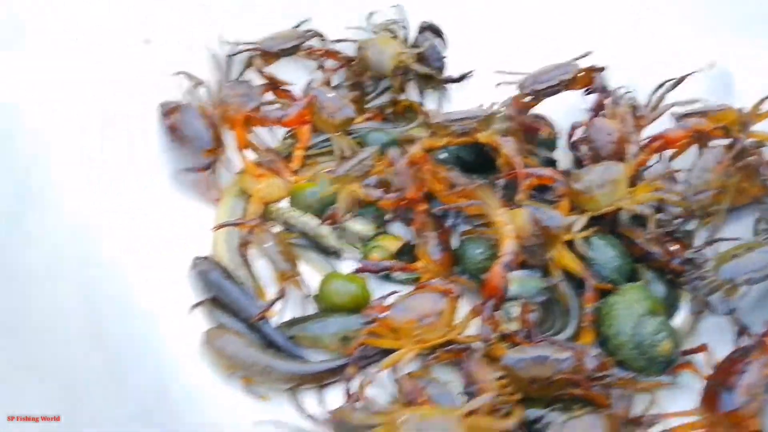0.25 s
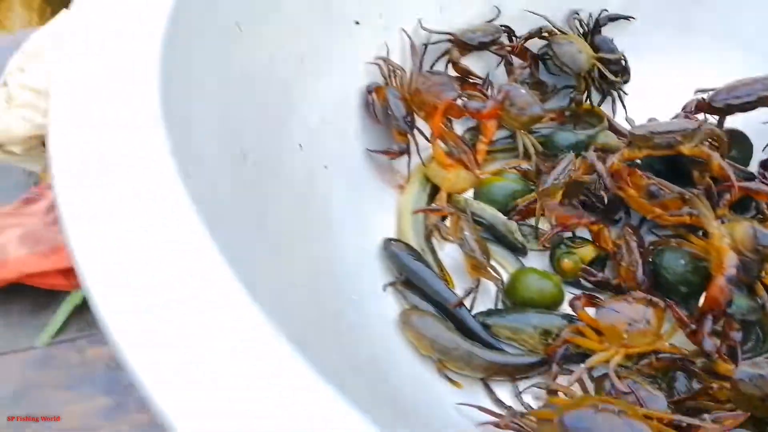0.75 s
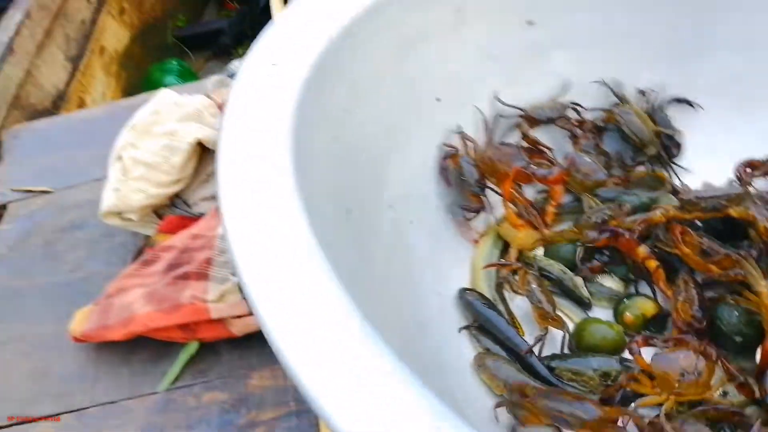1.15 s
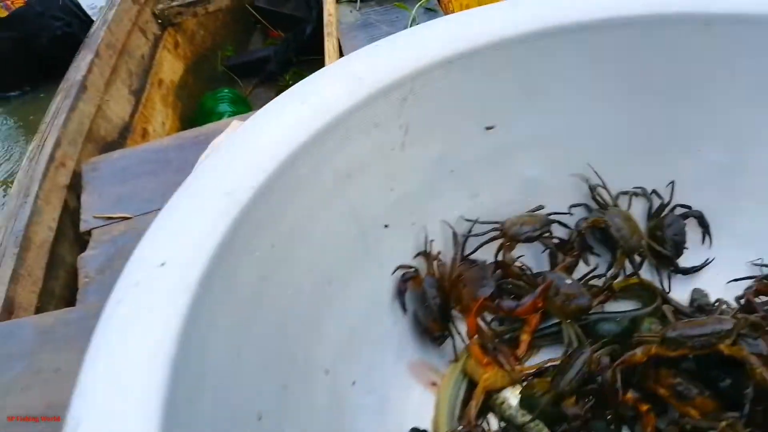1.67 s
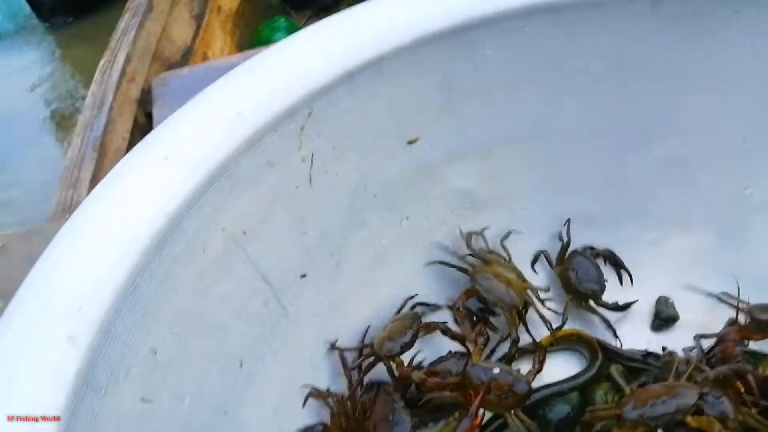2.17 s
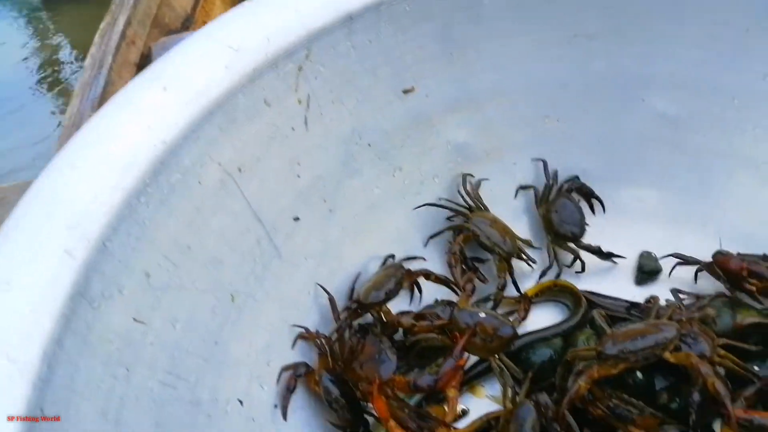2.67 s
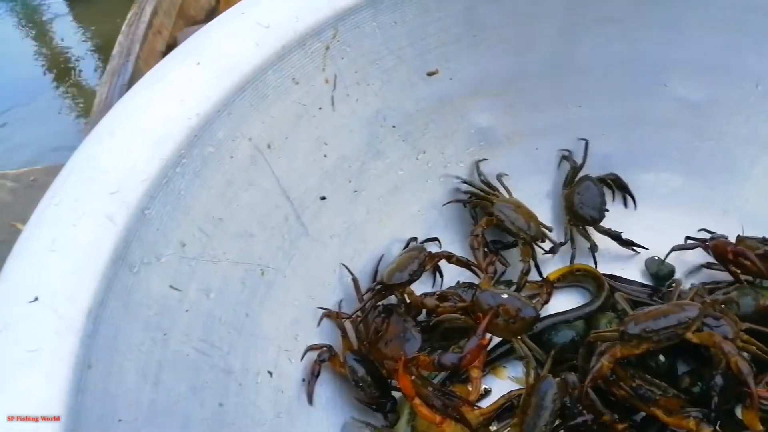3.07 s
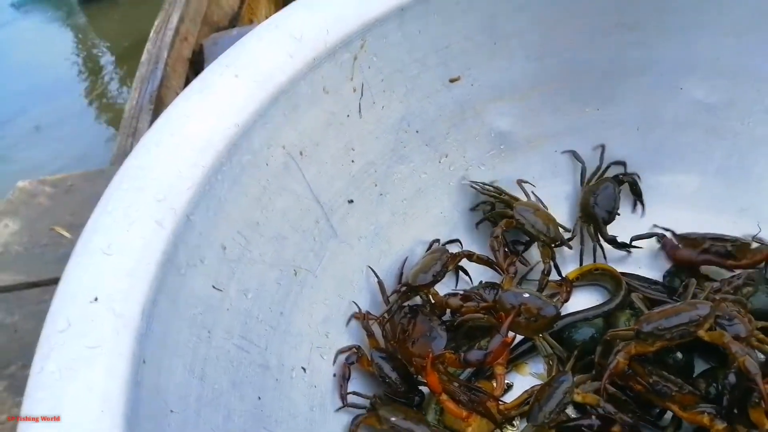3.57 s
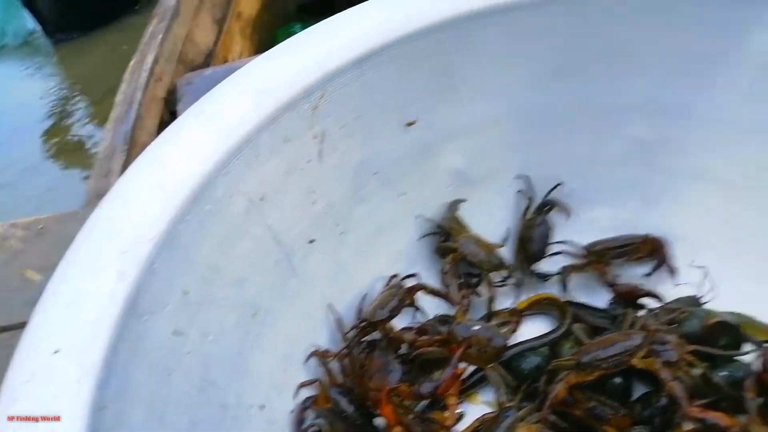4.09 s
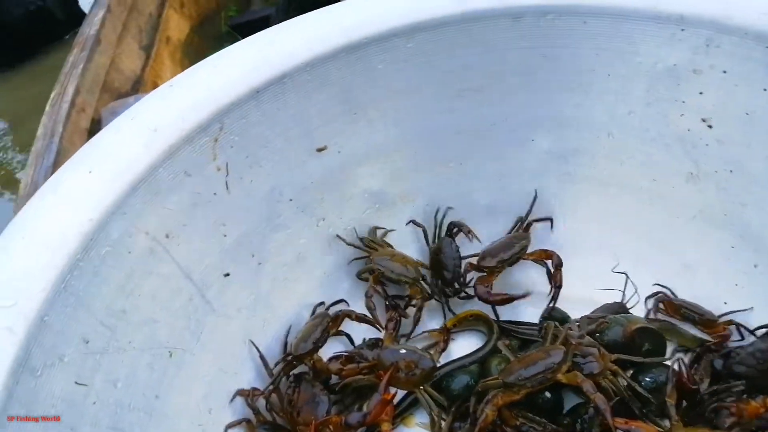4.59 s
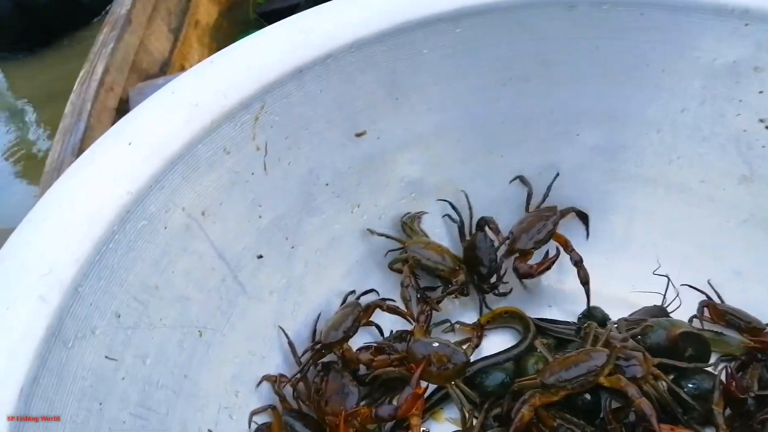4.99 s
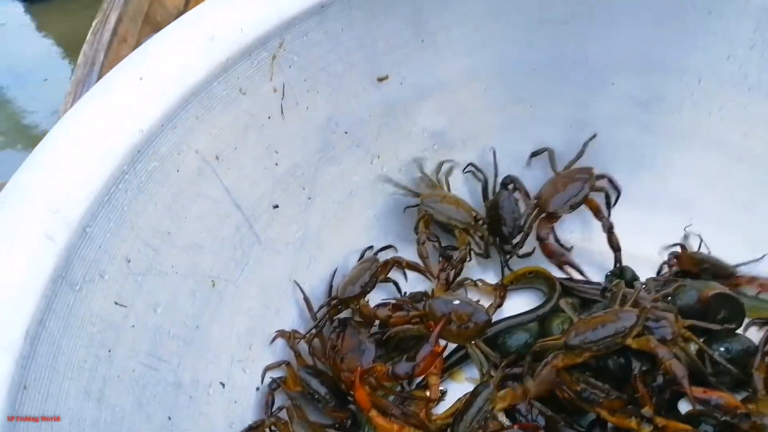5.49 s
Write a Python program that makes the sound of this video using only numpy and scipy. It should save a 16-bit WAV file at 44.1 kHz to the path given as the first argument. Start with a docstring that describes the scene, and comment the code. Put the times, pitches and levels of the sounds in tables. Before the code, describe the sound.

Live crabs and a few fish move in a large plastic tub outdoors, heard close. Throughout, claws scratch in uneven showers of tiny bright clicks, mixed with wet slithering and brief snaps of shell on shell. From about 1.2 to 2.2 seconds a hand handles the camera loudly: rubbing and hollow knocks around 1.5, then a cluster of dull thuds around 2. Shells tap the tub wall sharply at 2 and 2.8 seconds, and hardest at 3.3, where the wall rings briefly and the tub booms softly. Busier scraping, leg rasps and taps follow until about 3.9. The scrabbling then eases, with small pings and a tap near 4.5, and another short hand knock and rub at 4.7. Clicking picks up again from 5.2 seconds to the end, near 5.7. A faint hush of open air and a light breeze rumble lie underneath.

```python
"""Live crabs and a few fish crawl over one another in a large plastic tub on a wooden boat.
Claws scratch in showers of tiny clicks, wet bodies slither, and shells tap the wall, once very hard.
The wall rings and the air in the tub booms softly. Close by, a hand rubs, bumps and knocks
on a camera body, while a light breeze rumbles on the microphones."""
import sys
import numpy as np
from scipy import signal
from scipy.fft import rfft, irfft
from scipy.io import wavfile

SR = 44100
rng = np.random.default_rng(int(sys.argv[2]) if len(sys.argv) > 2 else 0)


def dump_mix(stems):
    """Bounce the given channels to the path in sys.argv[1] as a 16-bit WAV at rate SR."""
    frames = np.atleast_2d(stems).T  # one column per channel
    limited = np.clip(frames, -1, 1)  # hard clip at full scale
    pcm = np.round(limited * 32767).astype(np.int16)
    wavfile.write(sys.argv[1], SR, pcm)


N = 253134
TIME = np.arange(N) / SR


# One crab after another climbing the heap: t/s, length/s, scratch level/dB, slither level/dB, shell f/Hz
SCRAMBLE_MOVES = [(-0.02, 0.15, -41.5, -47, 2880), (0.143, 0.12, -41.5, -52.5, 2620),
                  (0.277, 0.083, -43, -64, 3250), (0.38, 0.25, -44, -55.5, 2860),
                  (0.649, 0.042, -40, -55, 2800), (0.793, 0.086, -46, -73, 2940),
                  (0.883, 0.14, -43.5, -54.5, 2760), (1.02, 0.041, -38, -40, 3350),
                  (1.172, 0.064, -44, -59, 3200), (1.24, 0.06, -40, -59, 3200),
                  (1.28, 0.46, -41, -48.5, 3640), (1.69, 0.029, -35, -49, 3470),
                  (1.767, 0.56, -39.5, -50.5, 3140), (2.082, 0.1, -32.5, -43, 3360),
                  (2.159, 0.115, -56, -43, 3340), (2.369, 0.16, -47, -48.5, 3200),
                  (2.541, 0.093, -38.5, -47, 3060), (2.645, 0.089, -40.5, -48.5, 3700),
                  (2.761, 0.16, -38, -49.5, 3440), (2.918, 0.11, -41, -50.5, 2600),
                  (3.027, 0.12, -40.5, -49, 3230), (3.073, 0.067, -36, -43.5, 3000),
                  (3.158, 0.26, -37.5, -50, 3380), (3.26, 0.075, -28.5, -38.5, 3520),
                  (3.391, 0.045, -32.5, -54, 2925), (3.436, 0.18, -33, -46, 3400),
                  (3.633, 0.25, -35.5, -45.5, 3000), (3.86, 0.14, -47, -53, 3220),
                  (4.03, 0.17, -43, -53, 3220), (4.24, 0.059, -42.5, -53, 3000),
                  (4.366, 0.1, -43, -52, 2960), (4.516, 0.23, -46.5, -54.5, 3230),
                  (4.8, 0.087, -42.5, -52.5, 3320), (4.946, 0.024, -45, -61, 3180),
                  (4.99, 0.092, -47, -51, 3150), (5.13, 0.032, -36.5, -67, 3320),
                  (5.205, 0.18, -42.5, -72, 3720), (5.281, 0.087, -40, -52.5, 3550),
                  (5.375, 0.16, -36, -48, 3340), (5.413, 0.13, -38, -40.5, 3300),
                  (5.478, 0.099, -36, -41.5, 3400), (5.605, 0.1, -41, -46.5, 3450),
                  (5.72, 0.03, -36, -44, 3650)]
# Where the busiest crabs are: t/s, left minus right level/dB
CRAB_POSITION = [(0.0, -4), (0.27, -2), (0.77, -7.5), (3.31, 0), (3.42, -4.5), (5.74, -5)]
# The sharp tone of a claw, from low to high: f/Hz, level/dB
CLAW_SPECTRUM = [(200, -27.5), (550, -26), (1000, -26), (1600, -17.5), (2050, -13), (2600, -4), (3100, 0),
                 (3600, -1), (4500, -8.5), (6000, -14.5), (9000, -22.5), (15000, -42)]
# The hiss of sliding bodies or skin: f/Hz, level/dB
SLIDING_SPECTRUM = [(200, -8.5), (550, -9), (1000, -29), (2000, -15), (3000, 3), (4000, 3.5), (5500, 3),
                    (7500, -1), (9500, -4.5), (12000, -16.5), (15000, -35.5)]

def crabs():
    """Claw tips scratch over plastic and shell, wet bodies slide, and the tub rings along."""
    starts, lengths, scratch_db, slither_db, shell_hz = np.transpose(SCRAMBLE_MOVES)
    scratching = efforts(zip(starts, lengths, scratch_db), attack_s=0.016, release_s=0.017, rest_db=-54)
    slithering = efforts(zip(starts, lengths, slither_db), attack_s=0.016, release_s=0.017, rest_db=-58)
    place_db = np.interp(TIME, *np.transpose(CRAB_POSITION))
    pitch_hz = np.interp(TIME, starts + lengths / 2, shell_hz)
    tapping, blows = claw_taps()
    legs = jerks(per_s=90, t60=0.045, depth=1.5)
    scratch = scratching * legs * grains(per_s=2200, spread_db=2.5, clump_db=-1, clump_rate=200)
    clatter = from_db(-5) * scratching * legs * shell_clatter(pitch_hz * 2 ** (0.08 * drift(25)))
    wet_clicks = grains(per_s=9700, spread_db=0.5, clump_db=-0.55, clump_rate=94)
    slither = colour(from_db(3.5) * slithering * legs * wet_clicks, SLIDING_SPECTRUM)
    contacts = from_db(-6) * colour(scratch, CLAW_SPECTRUM) + clatter + tapping + leg_rasps() + slither
    wall = from_db(-8) * tub_wall(blows + from_db(-36) * scratch)
    boom = tub_air(from_db(33.5) * blows + from_db(-4) * scratch[0])
    heap = tub_echo(contacts, t60=0.083, echo_db=-3) * pan(place_db) + boom * pan(-3.2)
    return left_late(heap, samples=12) + (wall + claw_squeaks() + claw_pings()) * pan(-4)


def shell_clatter(pitch_hz, t60=0.018, turns_db=5, spread_hz=420):
    """Legs and shells of many sizes each ring at their own pitch; those near pitch_hz are loudest."""
    out = 0
    for hz in np.geomspace(2550, 4100, 18):
        nearness = np.exp(-((hz - pitch_hz) / spread_hz) ** 2)
        clicks = (rng.random(N) < 250 / SR) * rng.standard_normal(N)
        strength = from_db(turns_db * np.clip(drift(30), -2, 1.3))
        out = out + pan(3 * rng.normal()) * ring(nearness * strength * clicks, hz, t60)
    highs_only = signal.butter(3, 2200, "high", fs=SR, output="sos")  # too small to give off low notes
    return rms_one(signal.sosfilt(highs_only, out))


# The notes the plastic wall rings with: f/Hz, level/dB, ring time/s
WALL_NOTES = [(195, -29, 0.2), (254, -30, 0.081), (296, -7, 0.17), (536, -12.5, 0.94), (595, -10, 0.32),
              (639, -21, 0.45), (885, -9.5, 0.27), (1224, -2, 0.028), (2464, 1, 0.46), (2526, 6.5, 0.19),
              (2670, -11.5, 0.47), (3430, -25, 0.45), (3390, -7, 0.087), (4000, 1, 0.21)]

def tub_wall(force, pair_split=0.0053, left_db=3.5):
    """The wall is not quite round, so each note is a close pair of tones that throb together."""
    out = 0
    for hz, db, t60 in WALL_NOTES:
        pair = (ring(force, hz, t60) + 0.75 * ring(force, hz * (1 - pair_split), t60)) / 2
        out = out + from_db(db) * pan(2 * rng.normal() + left_db) * pair
    return out


def tub_air(force, hz=573, width_hz=210):
    """The air in the tub booms softly and hangs on after each touch."""
    resonance = signal.iirpeak(hz, hz / width_hz, fs=SR)
    boom = signal.lfilter(*resonance, signal.lfilter(*resonance, force))
    return merge_bass(tub_echo(np.vstack([boom, boom]), t60=0.4, echo_db=-1), below_hz=700)


def tub_echo(x, t60, echo_db):
    """Sound bounces between the tub walls in many quick echoes."""
    t = seconds(0.25)
    tail = rng.standard_normal((2, len(t))) * dying(t, t60) * (t > 0.001)
    tail /= np.linalg.norm(tail, axis=1, keepdims=True)
    return x + from_db(echo_db) * signal.oaconvolve(x, tail, axes=1)[:, :N]


# The hush of open air: f/Hz, level/dB
AIR_SPECTRUM = [(20, -15), (90, -10.5), (190, -7), (420, -14.5), (560, -5), (760, -10.5), (1000, -11),
                (2200, -10), (4000, -33.5)]
# How the breeze rises and falls: t/s, level/dB
BREEZE_LEVELS = [(0.0, -50.5), (1.42, -72.5), (1.79, -60), (2.27, -55.5), (2.3, -48.5), (2.96, -53.5),
                 (3.01, -46.5), (3.36, -64), (3.63, -56), (3.69, -73), (3.98, -52.5), (4.03, -58.5),
                 (4.81, -52.5), (5.16, -46.5), (5.2, -59), (5.74, -60.5)]
# The low rumble of wind on a microphone: f/Hz, level/dB
WIND_SPECTRUM = [(15, -5), (45, -1), (90, -2.5), (160, -14), (400, -20.5), (1500, -74)]

def outdoors():
    """Open air makes a faint hush, and a breeze pushes on each microphone separately."""
    breeze = from_db(np.interp(TIME, *np.transpose(BREEZE_LEVELS)))
    hush = merge_bass(colour(rng.standard_normal((2, N)), AIR_SPECTRUM), below_hz=660)
    rumble = colour(rng.standard_normal((2, N)), WIND_SPECTRUM) * from_db(0.63 * drift(9.8))
    return from_db(-59) * hush * pan(-9) + from_db(3.5) * breeze * rumble * pan(-0.5)


# Strokes of the hand: t/s, length/s, dull rub level/dB, bright hiss level/dB
HAND_STROKES = [(0.0, 0.23, -55, -77), (0.389, 0.036, -50, -75.0), (0.877, 0.77, -53.5, -76.0),
                (1.226, 0.12, -42.5, -49), (1.313, 0.22, -35, -37), (1.566, 0.08, -29, -32.5),
                (1.706, 0.026, -34.5, -39.5), (1.774, 0.03, -35, -40.5), (1.845, 0.23, -37.5, -41),
                (2.07, 0.115, -33, -36.5), (4.598, 0.018, -47, -76), (4.715, 0.028, -45, -63),
                (4.768, 0.15, -47.5, -71), (4.944, 0.11, -56, -76.0), (5.455, 0.49, -52, -70.0)]
# The dull tone of rubbing skin: f/Hz, level/dB
RUB_SPECTRUM = [(80, -41), (170, -13), (260, 3.5), (450, -1.5), (700, -0.5), (1000, -0.5), (1600, -5),
                (2500, -3.5), (3300, -6), (4500, -15), (8000, -19.5), (15000, -72)]

def hand_rubbing():
    """Skin drags over the camera body, catching and letting go in countless tiny clicks."""
    starts, lengths, dull_db, bright_db = np.transpose(HAND_STROKES)
    dull = efforts(zip(starts, lengths, dull_db), attack_s=0.011, release_s=0.031, rest_db=-69.5)
    bright = efforts(zip(starts, lengths, bright_db), attack_s=0.011, release_s=0.031, rest_db=-82.5)
    dull *= jerks(per_s=60, t60=0.05, depth=0.6)
    rush, chafe = hand_slips()
    skin = grains(per_s=9000, spread_db=1.2, clump_db=1.8, clump_rate=110)
    drag = colour(from_db(0.5) * dull * skin + rush, RUB_SPECTRUM)
    drag += from_db(-4.5) * dull * cupped_hand()
    fine_clicks = grains(per_s=12000, spread_db=1.5, clump_db=2.5, clump_rate=160)
    hiss = colour(bright * fine_clicks, SLIDING_SPECTRUM)
    return (from_db(1.5) * merge_bass(drag, below_hz=220) + chafe) * pan(-5.5) + hiss * pan(-4)


# The notes of the air pocket under the hand: f/Hz, level/dB, width/Hz
POCKET_NOTES = [(243, -2.5, 91), (570.4, 4, 54), (900, -1.5, 86), (1223, 0, 240), (1675, 1, 220),
                (2094, -5, 80), (3180, -5.5, 300)]

def cupped_hand(wander_octaves=0.045, turns_db=8.5):
    """Rubbing sounds the hollow under the hand; as the grip shifts, its notes bend and take turns."""
    out, bend = 0, wander_octaves * drift(14)
    for hz, db, width_hz in POCKET_NOTES:
        strength = from_db(db + turns_db * np.clip(drift(45), -2, 1.2))
        out = out + pan(4 * rng.normal()) * strength * rough_tone(hz * 2 ** bend, width_hz)
    return rms_one(out)


# Soft bumps of the hand: t/s, level/dB, f/Hz
SOFT_BUMPS = [(0.053, -35.5, 194), (1.236, -26.5, 171), (1.246, -29.5, 337), (1.668, -42, 337),
              (1.793, -18, 350), (1.813, -20, 125), (1.875, -20.5, 319), (1.897, -18.5, 282),
              (1.928, -25, 287), (1.959, -16.5, 273), (1.976, -16.5, 286), (2.001, -12.5, 238),
              (2.01, -23.5, 181), (2.032, -19.5, 298), (2.061, -21, 225), (2.228, -28, 265),
              (2.35, -36.5, 256), (2.448, -25, 266.6), (2.481, -33, 280), (4.71, -29, 249),
              (4.755, -39.5, 271)]

def hand_bumps():
    """Fingers settle on the camera body with blunt thuds, a little different on either side."""
    out, t = np.zeros((2, N)), seconds(0.16)
    shape = (1 - np.exp(-(t / 0.0033) ** 2)) * dying(t, t60=0.08)
    for start, db, hz in SOFT_BUMPS:
        uneven = np.array([rough_tone(np.full(len(t), 1.314 * hz), 0.68 * hz) for side in range(2)])
        add(out, start, from_db(db + 1.5) * shape * (np.sin(2 * np.pi * hz * t) + 0.44 * uneven))
    return out * pan(-4)


# Legs scraping along the wall: t/s, level/dB, length/s, f/Hz
LEG_SCRAPES = [(0.077, -45.5, 0.11, 2660), (0.872, -46.5, 0.022, 2700), (3.433, -35, 0.0092, 3030),
               (3.453, -38, 0.016, 3700), (3.5, -30, 0.023, 3200), (3.539, -30, 0.024, 3230),
               (3.568, -27.5, 0.011, 2960), (3.602, -38, 0.013, 3100), (3.655, -36, 0.065, 3100),
               (3.714, -35.5, 0.024, 3040), (3.751, -24.5, 0.0063, 2910), (3.786, -35, 0.041, 2880),
               (3.884, -38, 0.048, 3200), (4.472, -35.5, 0.0071, 3070), (5.594, -32.5, 0.015, 3250)]

def leg_rasps(slips_per_s=460):
    """A leg judders along the wall in quick uneven slips, each ringing at the pitch of that leg."""
    out, t = np.zeros(N), seconds(0.12)
    for start, db, length, hz in LEG_SCRAPES:
        times = np.cumsum(rng.uniform(0.5, 1.5, size=64)) / slips_per_s
        times -= times[0]
        slips, inside = np.zeros(len(t)), times < length
        slips[(times[inside] * SR).astype(int)] = rng.uniform(0.3, 1, size=64)[inside]
        rasp = ring(slips, hz, t60=0.011)
        strength = np.sqrt(np.sum(rasp ** 2) / (length * SR))
        add(out, start, from_db(db) * rasp / strength)
    return signal.sosfilt(signal.butter(2, 2200, "high", fs=SR, output="sos"), out)


# Dull hollow knocks (the one at 4.28 s is a claw): t/s, level/dB, f/Hz
HOLLOW_HITS = [(0.221, -42, 1060), (1.05, -41, 1330), (1.24, -35, 1420), (1.288, -30.5, 1350),
               (1.33, -40, 1010), (1.347, -33, 1760), (1.407, -23, 1260), (1.508, -23, 2160),
               (1.5549, -17, 1097), (1.579, -25, 1360), (1.597, -25, 1620), (1.714, -33, 1370),
               (1.782, -31, 1230), (1.876, -33, 2220), (1.91, -52, 1430), (4.28, -40, 1280),
               (4.616, -45, 1450), (4.715, -21, 1646), (4.7178, -29, 1660), (4.794, -44, 1750),
               (4.882, -39, 1490), (5.179, -39.5, 1780), (5.513, -45, 1540), (5.683, -44, 1620)]
# The notes inside one knock: multiple of its pitch, level/dB, ring time/s
KNOCK_NOTES = [(0.155, -30, 0.049), (0.35, -0.5, 0.015), (0.73, -13, 0.05), (0.88, -6.5, 0.02),
               (1, -2, 0.039), (1.25, -4, 0.02)]

def hollow_knocks():
    """Dull hollow knocks: fingers on the camera body, and the low note of a claw pinging the tub wall."""
    out, t = np.zeros(N), seconds(0.1)
    rise = 1 - np.exp(-t / 0.00095)
    for start, db, hz in HOLLOW_HITS:
        for k, (ratio, note_db, t60) in enumerate(KNOCK_NOTES):
            note = (-1) ** k * dying(t, t60) * np.sin(2 * np.pi * ratio * hz * t)
            add(out, start, from_db(db + note_db + 2 * rng.normal()) * rise * note)
    return out * pan(-13)


# Claws and shells hitting the wall: t/s, level/dB, shell f/Hz, level of the blow relative to the tap/dB
WALL_HITS = [(0.236, -32, 2750, -12), (0.28, -29, 3730, -26), (0.5, -26.5, 2940, -38),
             (0.771, -32.5, 2500, -28), (1.977, -11.5, 2900, -18), (2.325, -29, 3680, -31),
             (2.362, -25.5, 3280, -40), (2.382, -28, 3130, -22), (2.499, -32, 3100, -13),
             (2.541, -27, 2850, -22), (2.816, -16.5, 3440, -25), (2.882, -33, 3200, -28),
             (3.265, -9, 3610, -9), (3.371, -26, 3440, -14), (3.493, -16.5, 3460, -23),
             (3.532, -19.5, 3400, -19.5), (3.57, -21, 3000, -20), (3.645, -23, 3140, -27),
             (3.716, -26.5, 3070, -12.5), (3.891, -27, 2900, -39), (3.979, -27, 3230, -28),
             (4.241, -28, 3130, -18), (4.456, -17, 3840, -32), (4.795, -28, 3180, -27),
             (5.202, -27.5, 3560, -18), (5.299, -24, 3850, -23), (5.346, -33, 3070, -29),
             (5.452, -22.5, 3260, -28), (5.596, -20, 3230, -35), (5.683, -27.5, 3550, -12.5)]

def claw_taps():
    """A claw cracks on the wall, rings and skids to rest; gives the sound and the blows to the tub."""
    cracks, rings, blows, t = np.zeros((2, N)), np.zeros((2, N)), np.zeros(N), seconds(0.2)
    bite = from_db(-14.5) * (dying(t, t60=0.011) + dying(t, t60=0.075))  # quick crack, longer skid
    for start, db, hz, wall_db in WALL_HITS:
        add(cracks, start, from_db(db) * bite * rng.standard_normal((2, len(t))))
        add(rings, start, from_db(db - 7) * dying(t, t60=0.028) * np.sin(2 * np.pi * hz * t))
        add(blows, start, from_db(db + wall_db) * np.ones(1))
    return colour(cracks, CLAW_SPECTRUM) + rings, blows


# Shell snapping on shell: t/s, level/dB
SHELL_FLICKS = [(0.2997, -37), (0.696, -36), (0.801, -33.5), (0.832, -49), (0.9594, -34), (2.614, -41),
                (3.6433, -19.5), (4.088, -31.5), (4.144, -37), (4.2612, -32), (4.281, -30), (4.862, -30),
                (5.5, -35), (5.642, -27)]
# The thin tone of a snap: f/Hz, level/dB
SNAP_SPECTRUM = [(1500, -15), (4000, 4), (8000, 3), (12000, -9), (16000, -23)]

def shell_snaps():
    """Hard shell edges flick past each other in a brief bright crackle."""
    out, t = np.zeros((2, N)), seconds(0.057)
    for start, db in SHELL_FLICKS:
        add(out, start, from_db(db - 7) * dying(t, t60=0.039) * rng.standard_normal((2, len(t))))
    return colour(out, SNAP_SPECTRUM)


# Sudden slips of the hand: t/s, level/dB, length/s, f/Hz, pitch slide/octaves
SKIN_SLIPS = [(1.24, -35.5, 0.01, 594, 0.012), (1.284, -27, 0.0075, 625, -0.043),
              (1.328, -35, 0.032, 1753, 0.021), (1.395, -32, 0.018, 1276, 0.19),
              (1.435, -29, 0.008, 2110, -0.062), (1.5, -24, 0.02, 584, -0.25),
              (1.554, -19, 0.028, 933, 0.13), (1.557, -35, 0.016, 416, -0.33),
              (1.576, -23, 0.031, 1286, -0.2), (1.594, -24, 0.022, 257.5, -0.17),
              (1.602, -22, 0.012, 853, 0.12), (1.614, -26.5, 0.035, 1547, -0.029),
              (1.635, -32.5, 0.052, 357, -0.126), (1.638, -28.5, 0.0197, 3280, -0.043),
              (1.707, -31.5, 0.024, 2200, -0.0018), (1.776, -29.5, 0.0097, 2240, 0.04),
              (1.784, -26.5, 0.021, 608, 0.024), (1.878, -32, 0.0043, 595, 0.015),
              (1.971, -24.5, 0.022, 579, 0.052), (4.684, -38.5, 0.018, 1540, -0.019),
              (4.711, -22.5, 0.0052, 1666, 0.053)]

def hand_slips(fade_db=7.5):
    """Skin slips fast; gives a rush of noise and a chafing tone that slides in pitch."""
    rush, chafe, t = np.zeros((2, N)), np.zeros((2, N)), seconds(0.15)
    for start, db, length, hz, glide in SKIN_SLIPS:
        progress = np.minimum(t / length, 1)
        shape = np.minimum(t / 0.00066, 1) * np.exp(-np.maximum(t - length, 0) / 0.0096)
        gain = shape * from_db(db - fade_db * progress)
        tone = rough_tone(hz * 2 ** (glide * progress), width_hz=0.087 * hz)
        add(rush, start, from_db(-7) * gain * rng.standard_normal((2, len(t))))
        add(chafe, start, from_db(7) * gain * np.tanh(0.45 * tone))  # grip limits the swing
    return rush, chafe


# Claws dragging on plastic with a thin squeak: t/s, level/dB, length/s, f/Hz, roughness width/Hz
CLAW_DRAGS = [(2.925, -52, 0.085, 1563, 100), (3.088, -56.5, 0.08, 1540, 200), (3.179, -47, 0.06, 2490, 90)]

def claw_squeaks():
    """A claw tip sticks and slips at a nearly steady pitch, and fades as it lets go."""
    out, t = np.zeros(N), seconds(0.21)
    for start, db, length, hz, width_hz in CLAW_DRAGS:
        shape = np.minimum(t / 0.013, 1) * np.exp(-(t / length) ** 2)
        add(out, start, from_db(db + 3) * shape * rough_tone(np.full(len(t), hz), width_hz))
    return out


# Claw tips flicking off the plastic: t/s, level/dB, f/Hz, ring time/s
CLAW_FLICKS = [(4.284, -33.5, 2492, 0.14), (4.655, -43, 2480, 0.15), (5.011, -37, 4340, 0.085),
               (5.014, -47.5, 2500, 0.25), (5.155, -44, 2520, 0.16), (5.388, -39, 2520, 0.12)]

def claw_pings():
    """A flick leaves one short ring, roughened by the claw that still touches the wall."""
    out, t = np.zeros(N), seconds(0.3)
    for start, db, hz, t60 in CLAW_FLICKS:
        tone = 0.85 * np.sin(2 * np.pi * hz * t) + 0.4 * rough_tone(np.full(len(t), hz), width_hz=260)
        add(out, start, from_db(db) * np.minimum(t / 0.0009, 1) * dying(t, t60) * tone)
    return out


def efforts(moves, attack_s, release_s, rest_db, tiring_db=4.5):
    """Loudness of moves (t/s, length/s, level/dB) that build up, tire and die back to a resting level."""
    power = from_db(rest_db) ** 2
    for start, length, db in moves:
        age = TIME - start
        shape = np.clip(age / attack_s, 0, 1) * np.exp(-np.maximum(age - length, 0) / release_s)
        strength = from_db(db - tiring_db * np.clip(age / length, 0, 1))
        power = power + (strength * shape) ** 2
    return np.sqrt(power)


def jerks(per_s, t60, depth):
    """A leg or finger catches and skids to rest, so the loudness jumps up and falls back."""
    catches = (rng.random(N) < per_s / SR) * np.ones(N)
    effort = signal.lfilter([1], [1, -dying(1 / SR, t60)], catches)
    return rms_one(1 + depth * np.tanh(effort))


def grains(per_s, spread_db, clump_db, clump_rate):
    """Surfaces stick and slip in clumps of tiny clicks, each with its own strength left and right."""
    clicks = rng.random(N) < per_s / SR
    size_db = spread_db * np.minimum(rng.exponential(1, N), 4)
    swell_db = clump_db * np.clip(drift(clump_rate), -2, 2)
    return rms_one(clicks * from_db(size_db + swell_db) * rng.standard_normal((2, N)))


def rough_tone(hz, width_hz):
    """A rubbing tone that wavers at random; more width makes it rougher."""
    shake = rng.standard_normal((2, len(hz)))
    real, imag = signal.sosfilt(signal.butter(2, width_hz / 2, fs=SR, output="sos"), shake)
    phase = 2 * np.pi * np.cumsum(hz) / SR
    return rms_one(real * np.cos(phase) + imag * np.sin(phase))


def ring(force, hz, t60):
    """Each click in the force starts a pure tone that dies away."""
    decay, angle = dying(1 / SR, t60), 2 * np.pi * hz / SR
    return signal.lfilter([0, np.sin(angle)], [1, -2 * decay * np.cos(angle), decay ** 2], force + 1e-18)


def colour(x, spectrum, size=8192):
    """Shape the lows and highs of a sound by a table of f/Hz, level/dB; white noise keeps its power."""
    hz, db = np.transpose(spectrum)
    grid = np.maximum(np.arange(size // 2 + 1) * SR / size, 1)
    cepstrum = irfft(np.log(from_db(np.interp(np.log(grid), np.log(hz), db))))
    cepstrum[1:size // 2] *= 2  # folded so the filter rings only after a click, never before
    cepstrum[size // 2 + 1:] = 0
    response = irfft(np.exp(rfft(cepstrum)))
    return signal.oaconvolve(x, response[None] / np.linalg.norm(response))[:, :N]


def merge_bass(x, below_hz):
    """Low sounds have long waves, which reach both microphones alike."""
    low = signal.sosfiltfilt(signal.butter(2, below_hz, fs=SR, output="sos"), x)
    return x - low + low.sum(axis=0) / np.sqrt(2)


def left_late(x, samples):
    """The left microphone hears the sound a little later."""
    return np.vstack([np.pad(x[0], (samples, 0))[:N], x[1]])


def pan(left_db):
    """Left and right gains that make the left louder by left_db."""
    return from_db(np.vstack([left_db, -left_db]) / 2)


def drift(rate):
    """A random curve that heads for a new value `rate` times a second."""
    knots = rng.standard_normal(8192)
    return rms_one(np.interp(TIME * rate, np.arange(len(knots)), knots))


def add(track, start_s, sound):
    """Mix a short sound in at a moment."""
    first = int(start_s * SR)
    sound = sound[..., :N - first]
    track[..., first:first + sound.shape[-1]] += sound


def seconds(length):
    """The time of each sample in a short sound."""
    return np.arange(int(length * SR)) / SR


def dying(t, t60):
    """A fade that drops 60 dB in t60 seconds, the ring time."""
    return np.exp(-np.log(1000) * t / t60)


def from_db(db):
    """Turn decibels into a gain to multiply by."""
    return 10 ** (np.asarray(db) / 20)


def rms_one(x):
    """Scale to an average strength (rms) of one."""
    return x / np.sqrt(np.mean(x ** 2) + 1e-20)


def scene():
    """The crabs in their tub, the open air and the hand, heard together."""
    return crabs() + outdoors() + hand_rubbing() + hand_bumps() + hollow_knocks() + shell_snaps()


def record(dry, cutoff_hz=15400):
    """The very highest treble is cut off steeply."""
    return signal.sosfilt(signal.ellip(10, 0.1, 80, cutoff_hz, fs=SR, output="sos"), dry)


dry = scene()
out = record(dry)
dump_mix(out)
```